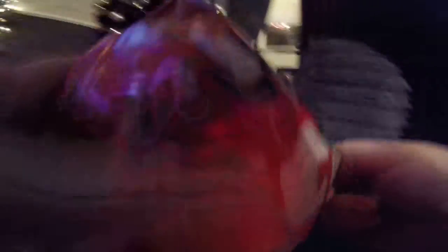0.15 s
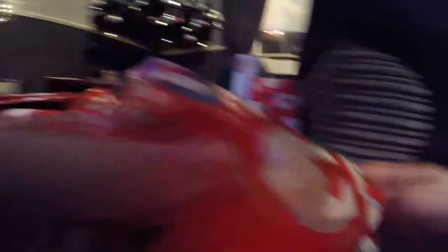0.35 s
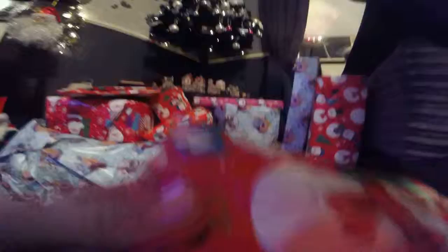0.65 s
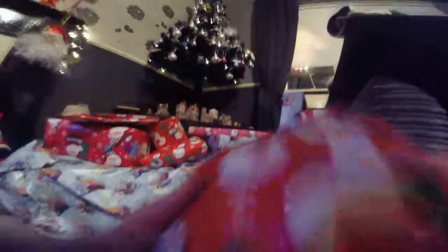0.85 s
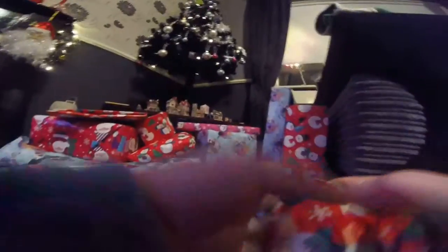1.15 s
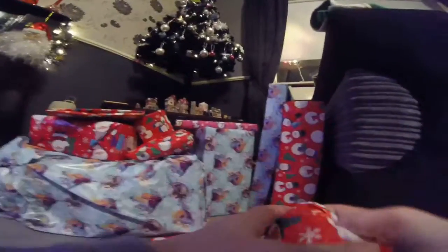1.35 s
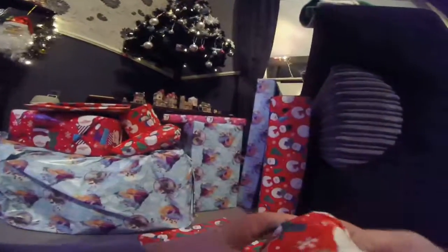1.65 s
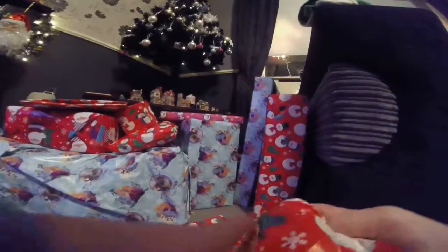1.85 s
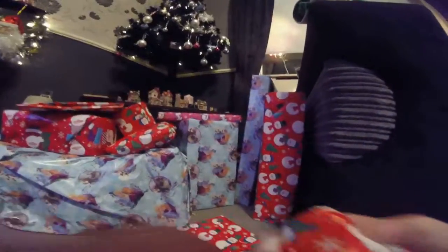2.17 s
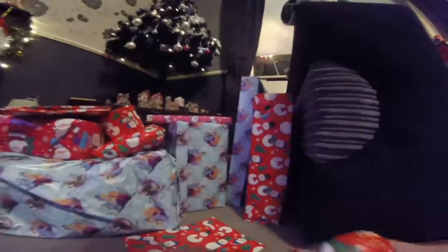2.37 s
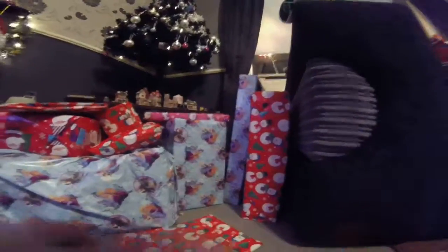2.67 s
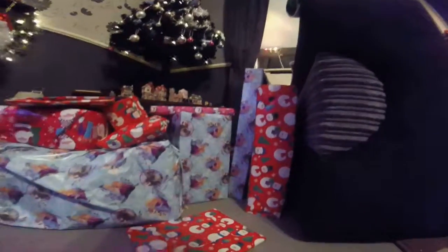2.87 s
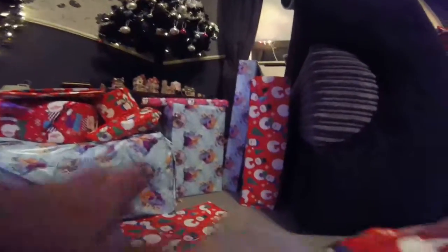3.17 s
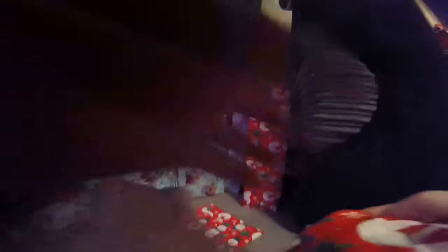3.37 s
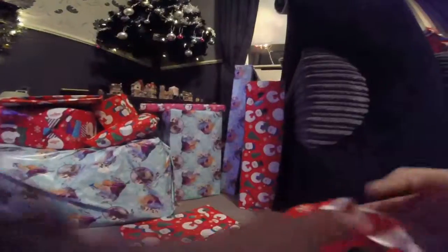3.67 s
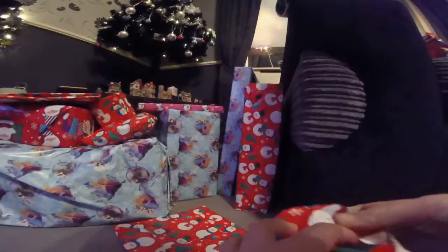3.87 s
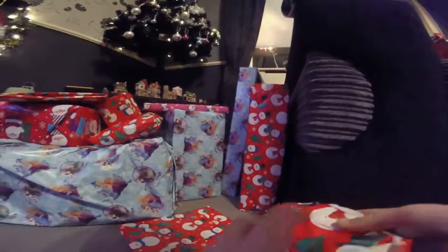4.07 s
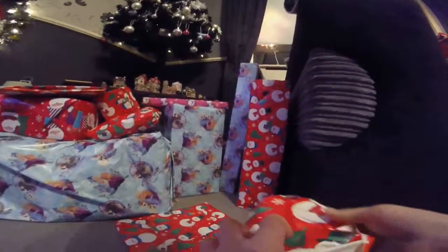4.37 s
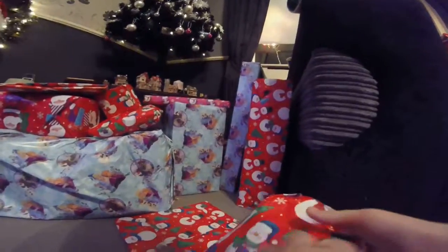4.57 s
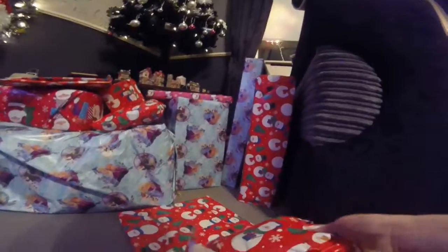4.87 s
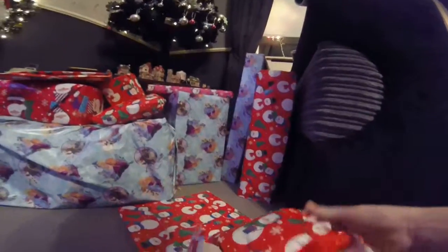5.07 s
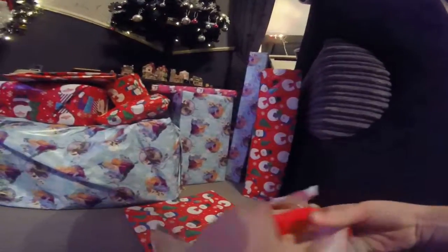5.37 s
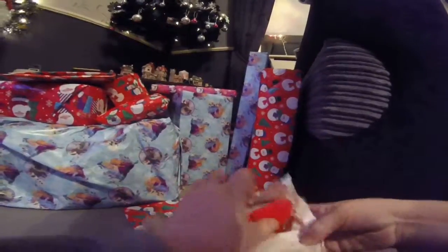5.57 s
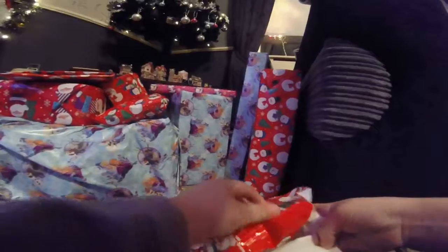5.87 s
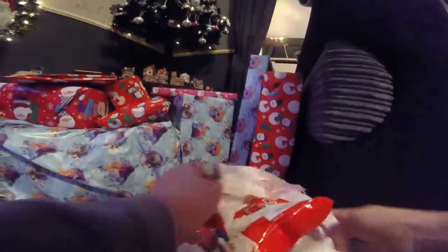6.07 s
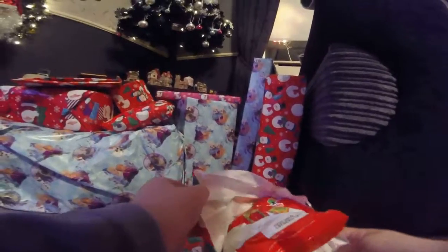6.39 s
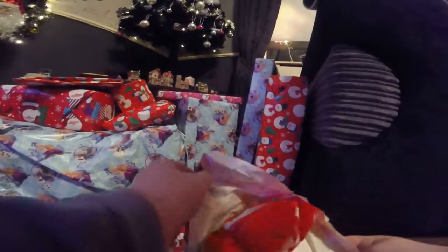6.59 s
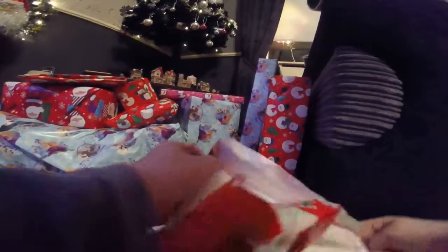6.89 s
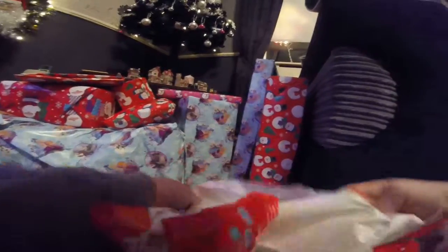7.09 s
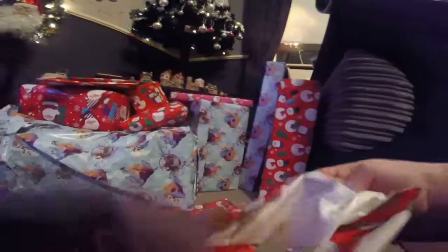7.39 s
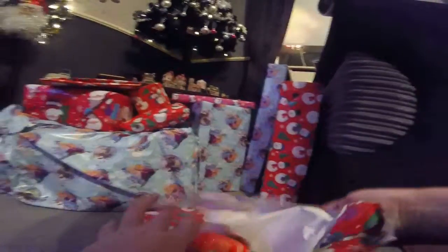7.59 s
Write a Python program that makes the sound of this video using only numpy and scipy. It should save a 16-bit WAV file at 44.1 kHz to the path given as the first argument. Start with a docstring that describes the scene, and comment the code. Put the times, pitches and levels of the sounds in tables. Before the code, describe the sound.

Close, crisp wrapping paper crackles and rips in irregular bursts as hands unwrap a soft parcel in a quiet furnished room.

```python
"""Gift paper torn and crumpled by hand

Hands tear and crumple gift paper round a soft bag, close to a small housed microphone in a furnished room.
Creases snap as short bursts of noise that the microphone housing makes ring; fibres crackle in clumps of random
clicks that ring twelve resonances; the same clicks make the sheet thud. A finger squeaks on the bag as narrow
noise, sleeves and fingers rumble as low noise, and knocks ring a few cycles. A faint hum and room noise lie
below."""
import sys
import numpy as np
from scipy import signal
from scipy.fft import rfft, irfft
from scipy.io import wavfile
from scipy.ndimage import uniform_filter1d

SR = 44100
rng = np.random.default_rng(int(sys.argv[2]) if len(sys.argv) > 2 else 0)


def file_out(sig):
    """Save sig as 16-bit WAV at sys.argv[1]."""
    # one column per channel
    cols = np.atleast_2d(sig).T
    # limit, then scale
    lim = np.clip(cols, -1, 1)
    pcm = np.round(lim * 32767).astype(np.int16)
    wavfile.write(sys.argv[1], SR, pcm)


N = 341334

# Spectrum of the crackle and snaps as the microphone colours them.
# Each row: frequency in Hz, relative level in dB per Hz.
BRIGHT_SPECTRUM = [(650, -25), (1100, -11), (1230, -10.5), (1610, -3.5), (2060, 1.5), (4030, -4),
                   (4410, -2), (4880, -8), (6040, -5.5), (6910, -9.5), (7720, -8.5), (8940, -17),
                   (12900, -23.5), (14300, -26), (16000, -14.5)]
# Spectrum of the buckling sheet, lifted by the microphone housing.
# Each row: frequency in Hz, relative level in dB per Hz.
THUD_SPECTRUM = [(41, -55), (70, -23.5), (166, -13.5), (242, -11), (307, -8), (459, -3), (767, 2),
                 (892, -2.5), (1220, -16.5), (1400, -20), (1820, -34), (3080, -120)]


def from_db(db):
    """Decibels to an amplitude factor; twice the decibels give a power factor."""
    return 10 ** (np.asarray(db) / 20)


def rms_one(x):
    """Scale to an RMS of 1."""
    return x / np.sqrt(np.mean(x ** 2) + 1e-20)


def peak_one(x):
    """Scale to a peak of 1."""
    return x / np.max(np.abs(x))


def colour(x, spectrum):
    """Causal (minimum-phase) filter with the given spectrum, built by folding its cepstrum; returns rows."""
    hz, db = np.transpose(spectrum)
    grid_hz = np.maximum(np.arange(2049) * SR / 4096, 1)
    grid_db = np.maximum(np.interp(np.log(grid_hz), np.log(hz), db), -70)
    cepstrum = irfft(np.log(from_db(grid_db)))
    cepstrum[1:2048] *= 2
    response = irfft(np.exp(rfft(cepstrum[:2049], 4096)))
    return signal.fftconvolve(np.atleast_2d(x), response[None], axes=1)[:, :np.shape(x)[-1]]


def drift(rate_hz):
    """Slow chance of spread 1: noise through a double one-pole low-pass, run in for a second."""
    r = np.exp(-2 * np.pi * rate_hz / SR)
    noise = rng.standard_normal(N + SR)
    return rms_one(signal.lfilter([1], [1, -2 * r, r * r], noise)[SR:])


def resonate(x, hz, width_hz):
    """One two-pole resonance with a gain of 1 on top."""
    r = np.exp(-np.pi * width_hz / SR)
    zeros = [(1 - r * r) / 2, 0, (r * r - 1) / 2]
    poles = [1, -2 * r * np.cos(2 * np.pi * hz / SR), r * r]
    return signal.lfilter(zeros, poles, x + 1e-18)


def in_time(rows):
    """Columns of a curve over time, joined by straight lines."""
    s, *columns = np.transpose(rows)
    return [np.interp(np.arange(N) / SR, s, c) for c in columns]


def stroke(start, swell_s, fade_s, swell_db, fade_db):
    """Power of one move: it climbs to 1, sinks (or holds, if fade_db is not above 0), and stops."""
    t = np.arange(N) / SR - start - swell_s   # 0 at the top of the move
    climb_db = swell_db * t / max(swell_s, 1e-4)
    sink_db = -fade_db * t / fade_s
    db = np.minimum(np.where(t < 0, climb_db, sink_db), 0)
    return from_db(2 * db) * (t >= -swell_s) * (t < fade_s)


def eased_db(power, edge_s):
    """Power to dB with edges softened by a moving average."""
    return uniform_filter1d(10 * np.log10(power), max(round(edge_s * SR), 1))


def background():
    """Steady coloured room noise with one faint sine hum."""
    # Spectrum of the room noise. Each row: frequency in Hz, relative level in dB per Hz.
    room_spectrum = [(12, -41), (20, -10), (160, 11.5), (302, -11), (753, -10), (1310, -33), (1990, -23),
                     (3460, -7), (6180, -22), (15000, -26)]
    noise_db, hum_db, hum_hz = -60, -59.5, 407   # both levels are RMS
    hum = from_db(hum_db) * np.sqrt(2) * np.sin(2 * np.pi * hum_hz * np.arange(N) / SR)
    noise = rms_one(colour(rng.standard_normal(N), room_spectrum)[0])
    return from_db(noise_db) * noise + hum


def room(x):
    """A dull decaying noise tail that starts after the first wall."""
    t60_s, level_db, cut_hz, first_wall_s = 0.075, -26.5, 3100, 0.008
    t = np.arange(SR // 2) / SR
    tail = rng.standard_normal(len(t)) * from_db(-60 * t / t60_s) * (t > first_wall_s)
    tail = signal.sosfilt(signal.butter(1, cut_hz, fs=SR, output="sos"), tail)
    tail = tail / np.sqrt(np.sum(tail ** 2))
    return from_db(level_db) * signal.fftconvolve(x, tail)[:N]


def sleeves():
    """Mean rumble level in dB: sleeves and fingers that brush the parcel add power to a steady rumble."""
    # Brushes over the parcel. Each row: start in seconds, length in seconds, rumble level in dB.
    brush_rows = [(0, 0.3, -47), (0.373, 0.074, -52), (0.927, .12, -41.5), (2.672, 0.15, -38.5),
                  (3.34, 0.025, -32.5), (3.36, 0.42, -46), (5.099, 0.05, -37), (6.148, 0.6, -54.5),
                  (6.532, 0.15, -49), (6.852, 0.16, -37.5), (7.026, 0.28, -45), (7.41, 0.31, -42)]
    between_db, edge_s = -54.5, 0.02
    power = from_db(2 * between_db)
    for start, length, db in brush_rows:
        power = power + from_db(2 * db) * stroke(start, 0, length, swell_db=0, fade_db=0)
    return eased_db(power, edge_s)


def rumble(level_db):
    """Lumpy low noise from sleeves and fingers, its level wandering about the given one."""
    # Spectrum of the rumble. Each row: frequency in Hz, relative level in dB per Hz.
    rumble_spectrum = [(12, -41), (20, 1), (118, 1.5), (265, -0.5), (390, -3), (660, -120)]
    lumps_db = 1.5 * drift(1.8)
    return from_db(level_db + lumps_db) * rms_one(colour(rng.standard_normal(N), rumble_spectrum)[0])


def knocks():
    """Dull knocks and folds of the parcel: sines that swell softly and die within a few cycles."""
    # Knocks and folds. Each row: start in seconds, peak level in dB, frequency in Hz.
    knock_rows = [(.1, -20.5, 695), (.284, -18.5, 740), (0.94, -30.5, 100), (0.987, -26, 392),
                  (2.26, -25, 310), (3.352, -28, 124), (3.43, -33.5, 139), (3.552, -29.5, 191),
                  (4.389, -26.5, 563), (4.406, -23.5, 574), (5.028, -24, 356), (5.103, -23.5, 487),
                  (5.129, -21, 500), (5.298, -33.5, 388), (5.834, -24.5, 605), (6.564, -6.5, 586),
                  (6.894, -15, 268), (7.474, -26, 242)]
    out, t = np.zeros(N), np.arange(4096) / SR
    for s, db, hz in knock_rows:
        knock = peak_one(t * np.exp(-1.05 * hz * t) * np.sin(2 * np.pi * hz * t))
        at = round(s * SR)
        out[at:at + 4096] += (from_db(db) * knock)[:N - at]
    return out


def squeak():
    """A finger slides on the bag: rough narrow noise, resonated twice, that swells and fades."""
    start_s, end_s = 3.412, 3.478
    hz, width_hz, top_db = 7500, 900, -43
    progress = np.clip((np.arange(N) / SR - start_s) / (end_s - start_s), 0, 1)
    narrow = rng.standard_normal(N)
    for _ in range(2):
        narrow = resonate(narrow, hz, width_hz)
    return from_db(top_db) * np.sin(np.pi * progress) * rms_one(narrow)


def snaps():
    """A crease lets go as a short spiky burst that the microphone housing makes ring at the frequency in its
    row, with a thud of the sheet."""
    # Single snaps, loud ones and quiet isolated ones. Each row: start in seconds,
    # peak level of the snap in dB, ring frequency in Hz, thud peak over snap peak in dB.
    snap_rows = [(0.2041, -20.5, 1757, -8), (0.2495, -21.5, 1800, -26), (.3091, -18, 1810, -1),
                 (0.5017, -18, 2190, -14), (0.6125, -14, 2130, -11), (.6672, -14, 2170, -27),
                 (0.6803, -11, 2160, -17), (0.712, -10, 1870, -13), (.791, -10.5, 3280, -5.5),
                 (0.8164, -16, 2800, -5.5), (0.8398, -5, 4560, -11), (.863, -0.5, 4650, -11.5),
                 (.887, -8.5, 1990, -9), (0.915, -12, 2290, -3.5), (0.971, -6, 3580, -32),
                 (.983, -4, 5900, -19), (.997, -1.5, 6200, -12.5), (1.0239, -10.5, 2350, -3),
                 (1.1137, -16.5, 3680, -14), (1.136, -17.5, 3400, -8), (1.1615, -15.5, 2280, -28),
                 (1.2437, -13.5, 1980, -12), (1.357, -23, 2000, -27), (1.3854, -24.5, 2150, 1),
                 (1.424, -13, 2680, -16), (1.4712, -10, 3490, -10), (1.5064, -13, 3340, -34),
                 (1.541, -10.5, 3490, -29), (1.5532, -8.5, 3480, -34), (1.567, -9.5, 2150, -10.5),
                 (1.6316, -16, 3650, -20), (1.6582, -10, 4450, -37), (1.679, -11.5, 3440, -34),
                 (1.697, -13.5, 2240, -4), (1.735, -9.5, 2210, -12.5), (1.777, -13, 1940, -28),
                 (1.8693, -20, 2160, -24), (1.9017, -12.5, 3680, -19), (1.9634, -17, 2130, -17),
                 (2.09, -12.5, 2640, -4), (2.152, -21, 2800, -4), (2.2783, -2, 2600, -22),
                 (2.3295, -15, 1980, -7), (2.443, -16.5, 4840, -30), (2.5455, -17.5, 2180, -0.5),
                 (2.5932, -9, 6300, -6.5), (2.7027, -2, 4520, 2), (2.7327, 1, 2300, -4),
                 (2.905, -15, 2000, -15), (2.924, -23, 3400, -22), (2.9691, -30.5, 2040, -1),
                 (3.1894, -32, 1930, -8), (3.2235, -26, 3450, -2), (3.2658, -27.5, 1950, -6),
                 (3.5692, -11, 4500, -14), (3.5988, -3, 1840, -13), (3.6907, -26, 3300, -2),
                 (3.718, -16.5, 2360, -23), (3.7871, -10, 3520, -13), (4.0448, -22, 3500, -28),
                 (4.4682, -13.5, 3360, -17), (4.747, -8, 2410, 2.5), (4.7919, -7.5, 1890, -24),
                 (5.0003, -19.5, 2750, -6), (5.04, -20.5, 2260, -17), (5.1489, -15, 2640, -3),
                 (5.5821, -18.5, 3550, -14), (5.6577, -13, 1730, -12), (5.7319, -17.5, 4370, -11),
                 (6.1375, -5.5, 3230, -16), (6.2078, -7, 2200, -8), (6.2605, -15.5, 1980, -7),
                 (6.339, -9.5, 3200, -8), (6.358, -11, 1930, -0.5), (6.424, -7, 1950, -3),
                 (6.52, -14, 3560, -21), (6.558, -8.5, 2160, -1), (6.6457, -10.5, 5800, -28),
                 (6.7427, -28, 3500, 5), (6.81, -16, 1870, -1.5), (7.0066, -12, 2050, -11),
                 (7.0487, -12.5, 2260, -12), (7.097, -9, 6340, -32), (7.1339, -9, 1540, -10),
                 (7.4421, -15.5, 1680, -10), (7.6635, -18.5, 2810, -26)]
    rise_s, middle_t60_s = 0.0004, 0.007
    count = len(snap_rows)
    out, t = np.zeros(N + 4096), np.arange(4096) / SR
    t60 = middle_t60_s * from_db(2.5 * rng.standard_normal((count, 1)))
    noise = rng.standard_normal((count, 4096))
    spiky = noise * np.abs(noise) ** 1.6
    crack = from_db(-60 * t / t60)
    after_crackle = 0.034 * from_db(-15 * t / t60)
    bursts = spiky * (1 - np.exp(-t / rise_s)) * (crack + after_crackle)
    # a second resonance at a random frequency, subtracted, colours each burst
    second_hz = 4500 * from_db(3.5 * rng.standard_normal(count))
    ringing = []
    for burst, (_, _, ring_hz, _), other_hz in zip(bursts, snap_rows, second_hz):
        ring = 2.5 * resonate(burst, ring_hz, 0.21 * ring_hz)
        second = 3.5 * resonate(burst, other_hz, 0.11 * other_hz)
        ringing.append(burst + ring - second)
    brights = colour(np.array(ringing), BRIGHT_SPECTRUM)
    thuds = colour(bursts, THUD_SPECTRUM)
    for (s, db, _, thud_db), bright, thud in zip(snap_rows, brights, thuds):
        at = round(s * SR)
        out[at:at + 4096] += from_db(db) * (peak_one(bright) + from_db(thud_db) * peak_one(thud))
    return out[:N]


def hands():
    """Crackle drive and thud over crackle, in dB: the pulls add their power to the rustle."""
    # The paper rustles in the hands between pulls; straight lines join the rows.
    # Each row: time in seconds, crackle drive in dB, sheet thud over crackle in dB.
    rustle_rows = [(0, -42, 1.5), (.55, -43, 1), (.83, -40.5, 2.5), (1.35, -50.5, 3), (1.63, -43.5, -7.5),
                   (2.05, -40, 3), (2.17, -49, 8), (2.33, -42.5, 2.5), (2.5, -42, -2.5), (2.865, -45, 4),
                   (2.91, -38.5, -2), (2.99, -58, 5), (3.1, -49.5, -2), (3.5, -52, 1), (3.68, -43.5, -6),
                   (3.95, -47, 1.5), (4.2, -46.5, 2.5), (4.4, -43, 3), (5.05, -46, 3.5), (5.35, -53.5, 4.5),
                   (5.62, -44.5, 1.5), (5.8, -50.5, 2.5), (6.3, -46.5, 3), (6.47, -46, 5.5),
                   (6.7, -38, 2.5), (6.76, -63, -1), (6.83, -48.5, 6.5), (7.35, -45, -2),
                   (7.74, -43.5, 3.5)]
    # Pulls that tear or crush the paper. Each row: start in seconds, swell in seconds, fade in seconds,
    # crackle drive at the top in dB, loss over the fade in dB (below 0: it holds), thud over crackle in dB.
    pull_rows = [(0.0, 0.017, 0.14, -35, 4.5, -6.5), (0.373, 0.0065, 0.075, -24, -0.5, 2.5),
                 (0.451, 0, 0.059, -29, 14, -2.5), (0.573, 0.027, 0.1, -36, 9, -11),
                 (0.735, 0.00013, 0.062, -22.5, 18, -0.5), (0.883, 0.072, 0.082, -24, 12.5, -4.5),
                 (1.039, 0.065, 0.031, -29, 9, -1.5), (1.225, 0.0092, 0.063, -31.5, 5, 1),
                 (1.406, 0.017, 0.048, -30.5, 15, -1), (1.49, 0.041, 0.099, -31, -2.5, -3),
                 (1.642, 0, 0.15, -33, 2, -3.5), (1.754, 0.11, 0.013, -39, 1, -22),
                 (2.232, 0.046, 0.025, -20.5, 15, -5), (2.625, 0.08, 0.024, -18, 3, -1),
                 (2.729, 0.011, 0.029, -14.5, 2.5, 1), (2.763, 0.002, 0.081, -17.5, 10.5, -1),
                 (3.333, 0.013, 0.022, -35, 2, 2), (3.4, 0.029, 0.034, -32.5, 12, -1.5),
                 (3.524, 0.061, 0.055, -27, 5, -1), (3.729, 0, 0.13, -32, 13.5, -1),
                 (4.047, 0, 0.1, -42.5, 2.5, -4), (4.536, 0.0023, 0.078, -32.5, 5, 1),
                 (4.647, 0, 0.13, -40.5, -11, 2.5), (4.73, 0, 0.086, -20, 13.5, -0.5),
                 (4.856, 0.051, 0.04, -40.5, -5, 9), (5.018, 0.011, 0.024, -30.5, 10.5, 2),
                 (5.101, 0, 0.22, -36, 10, 2.5), (5.441, 0.037, 0.099, -35.5, 15, 0.5),
                 (5.734, 0.0089, 0.0098, -29, 11, -4), (5.827, 0, 0.11, -33.5, 11, 5.5),
                 (6.024, 0, 0.18, -38.5, 8.5, 3), (6.132, 0.017, 0.089, -29, 0.5, 3),
                 (6.36, 0, 0.076, -26, 6.5, -1), (6.451, 0, 0.014, -22.5, 2, -3.5),
                 (6.488, 0, 0.011, -20, 5.5, -5.5), (6.543, 0.014, 0.11, -20, 9.5, 3.5),
                 (6.854, 0.032, 0.032, -18, 1.5, 1.5), (6.92, 0.0038, 0.1, -26.5, 1.8, 3),
                 (7.098, 0.022, 0.079, -30, 5.5, -3), (7.188, 0.017, 0.04, -26.5, 3.5, -4.5),
                 (7.44, 0.024, 0.16, -35, -1.2, 1.5), (7.601, 0.028, 0.062, -35.5, 0, 0.5)]
    swell_db, edge_s = 14, 0.0014   # a pull climbs this much to its top; after the fade the paper sticks
    drive_db, thud_db = in_time(rustle_rows)
    bright, thud = from_db(2 * drive_db), from_db(2 * (drive_db + thud_db))
    for start, swell_s, fade_s, db, fade_db, over_db in pull_rows:
        pull = from_db(2 * db) * stroke(start, swell_s, fade_s, swell_db, fade_db)
        bright = bright + pull
        thud = thud + from_db(2 * over_db) * pull
    return eased_db(bright, edge_s), eased_db(thud / bright, edge_s)


def fibres(per_s, clump_db, size_db):
    """Random clicks of uneven size that come in clumps; equal power whatever the mean rate."""
    clumps = 0.6 * drift(40) + 0.8 * drift(110)
    rate = per_s * from_db(clump_db * clumps)
    sizes = from_db(size_db * np.minimum(rng.exponential(1, N), 4)) * rng.choice([-1, 1], N)
    return sizes * (rng.random(N) < rate / SR) / np.sqrt(per_s)


def crackle(drive_db, thud_db):
    """Each click of a fibre rings one of twelve resonances; the same clicks shake the whole sheet."""
    # Colour of the paper; straight lines join the rows. Each row: time in seconds,
    # mean gain of the low part of the thud in dB, gain of the crackle's treble in dB.
    depth_rows = [(0, -3.5, 2.5), (2.4, -1, 0.5), (2.75, -4, 6), (3.6, -1, -1.5), (5.3, -4, -5),
                  (6.3, 1, -0.5), (6.95, 5, 1), (7.74, 0, -0.5)]
    low_hz, treble_hz = 320, 7000   # centre of the low part; corner above which the treble lies
    gain_db = 0.5   # from drive to level

    # a hard pull breaks more fibres, more evenly
    effort = np.clip((drive_db + 43.5) / 25, 0, 1) ** 1.6
    clicks = fibres(per_s=1100.0 * from_db(17 * effort), clump_db=7.0 - 3.5 * effort,
                    size_db=7.5 - 1.57 * effort)

    # sheets slide over each other
    slide = (0.15 + 0.12 * effort) * np.std(clicks) * rng.standard_normal(N)
    slide = slide * from_db((4.0 - 2.16 * effort) * drift(51))

    # slow drift plus chance choose the resonance that a click rings
    chosen = np.round(5.5 + 2.5 * drift(30) + 2.0 * rng.standard_normal(N)) % 12
    ringing = np.zeros(N)
    for k, hz in enumerate(np.geomspace(1500, 11000, 12)):
        driven = clicks * (chosen == k) + 0.61 * slide * from_db(6.9 * drift(3.8))
        ringing += resonate(driven, hz, 0.27 * hz) * np.sqrt(4000 / hz)

    low_db, treble_db = in_time(depth_rows)
    bright = rms_one(colour(2.7 * ringing + 0.72 * clicks + 0.14 * slide, BRIGHT_SPECTRUM)[0])
    treble = signal.sosfilt(signal.butter(1, treble_hz, "high", fs=SR, output="sos"), bright)
    bright = bright + (from_db(treble_db) - 1) * treble

    thud = rms_one(colour(clicks + 3.3 * slide, THUD_SPECTRUM)[0]) * from_db(1.7 * drift(13.0))
    low_gain = from_db(low_db + 2.2 * drift(6.7))
    thud = thud + (low_gain - 1) * resonate(thud, low_hz, low_hz)
    upper_gain = from_db(2.9 * drift(6.9))   # the gain around 1100 Hz wanders at random
    thud = thud + (upper_gain - 1) * resonate(thud, 1096, 410)
    return from_db(drive_db + gain_db) * (bright + from_db(thud_db) * thud)


def scene():
    """Paper in the room, handling and background."""
    paper = crackle(*hands()) + snaps() + squeak()
    handling = rumble(sleeves()) + knocks()
    return (paper + room(paper) + handling + background())[None]


def record(dry):
    """Peaks are rounded by soft saturation, then a steep low-pass cuts the top."""
    rounded = 0.95 * np.tanh(dry / 1.022)
    top_cut = signal.cheby2(12, 70, 16500, fs=SR, output="sos")   # 70 dB down from 16500 Hz up
    return signal.sosfilt(top_cut, rounded)


dry = scene()
out = record(dry)
file_out(out)
```